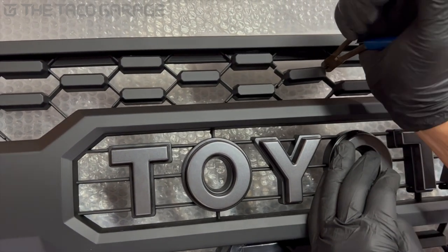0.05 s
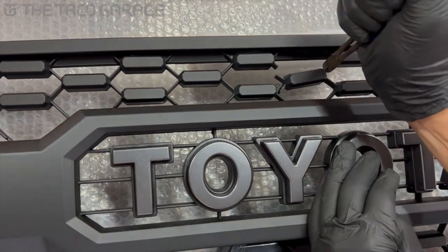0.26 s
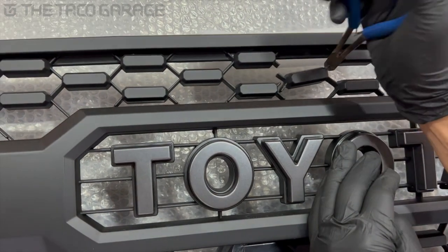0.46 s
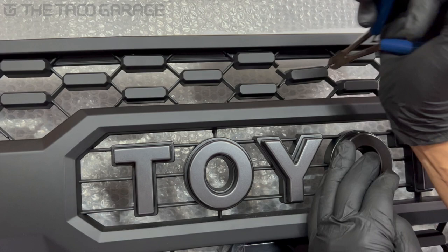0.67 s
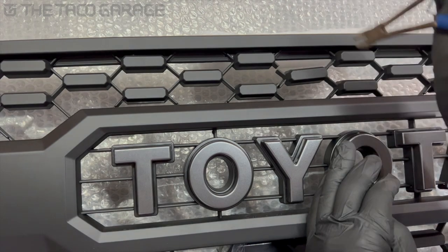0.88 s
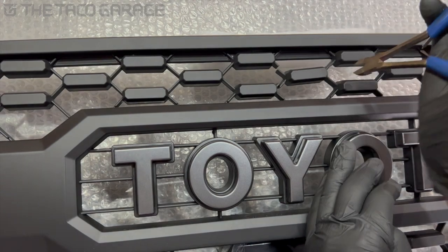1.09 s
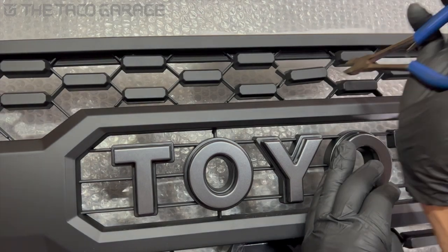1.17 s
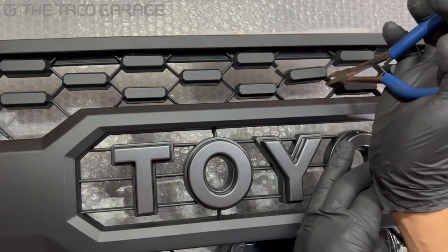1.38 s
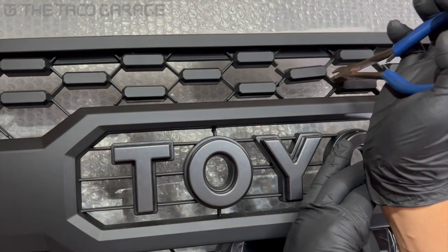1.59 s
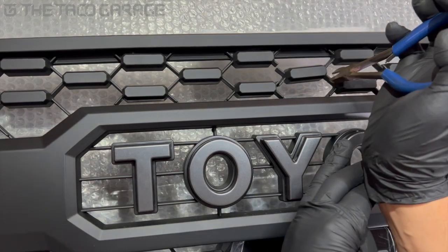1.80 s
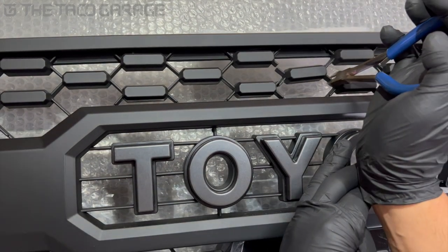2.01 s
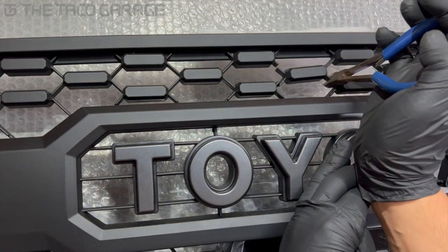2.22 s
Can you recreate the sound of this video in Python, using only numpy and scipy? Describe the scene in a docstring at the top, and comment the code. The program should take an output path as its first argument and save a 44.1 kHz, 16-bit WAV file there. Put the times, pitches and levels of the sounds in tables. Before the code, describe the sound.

Pliers snap through a plastic rib with one sharp loud crack, then knock on the hollow grille

```python
"""Pliers cutting a plastic grille

Close up in a garage, a plastic rib creaks and snaps; the jaws knock on the grille as they find the next rib.
Creak, jaws and grille are dying tones, with coloured noise for the crack, the contact ticks and dense ringing.
Metal clinks farther off, gloves rub, and the room adds its echo and a low rumble, both made from noise.
A limiter turns loud moments down, holds, then lets the room's echo swell back.
"""
import sys
import numpy as np
from scipy import signal
from scipy.fft import rfft, irfft
from scipy.io import wavfile
from scipy.ndimage import uniform_filter1d, minimum_filter1d

SR = 44100
rng = np.random.default_rng(int(sys.argv[2]) if len(sys.argv) > 2 else 0)


def file_out(sig):
    """Save sig as 16-bit WAV at sys.argv[1]."""
    # one column per channel
    cols = np.atleast_2d(sig).T
    # limit, then scale
    lim = np.clip(cols, -1, 1)
    pcm = np.round(lim * 32767).astype(np.int16)
    wavfile.write(sys.argv[1], SR, pcm)


N = 99225
T = np.arange(N) / SR  # time in s

# how alike left and right are for far sounds: f/Hz, likeness/0-1
FAR_LIKENESS = [(130, 0.99), (300, 0.42), (600, 0.069)]
# the same for sounds close by: f/Hz, likeness/0-1
NEAR_LIKENESS = [(100, 0.87), (500, 0.64), (1200, 0.14)]


def amp(db):
    """Turns decibels into a gain."""
    return 10 ** (np.asarray(db) / 20)


def read(points, hz):
    """Reads a table between its points, on a log-frequency axis."""
    f, value = np.transpose(points)
    return np.interp(np.log(hz + 1), np.log(f), value)


def add(mix, s, sound):
    """Mixes a sound in at time s, cutting off what runs past the end."""
    part = mix[:, round(s * SR):][:, :sound.shape[-1]]
    part += sound[..., :part.shape[1]]


def pan(db):
    """Left and right gains whose difference is db."""
    return amp(np.array([[db], [-db]]) / 2)


def fade(t, t60):
    """Exponential decay that falls by 60 dB in t60 seconds."""
    return np.exp(-np.log(1000) * t / max(t60, 1e-3))


def treble_tilt(hz, db_per_octave):
    """Level change in dB that grows with each octave above 1 kHz."""
    return db_per_octave * np.log2(np.maximum(hz / 1000, 1))


def noise(colour, likeness, size, tilt_db=0, decay=None):
    """Coloured stereo noise, scaled to unit power; with a decay table each band then dies at its own speed."""
    hz = np.fft.rfftfreq(size, 1 / SR)
    a, b = np.exp(2j * np.pi * rng.random((2, len(hz))))
    c = np.clip(read(likeness, hz), -1, 1)
    mid, side = a * np.sqrt(1 + c), b * np.sqrt(1 - c)
    level = amp(read(colour, hz) + treble_tilt(hz, tilt_db)) * (hz > 20)
    spectrum = np.array([mid + side, mid - side]) * level
    spectrum /= irfft(spectrum, size).std()
    if decay is None:
        return irfft(spectrum, size)
    centres = np.geomspace(100, 16000, 12)
    out = 0
    for f, band in zip(centres, np.eye(len(centres))):
        share = np.interp(hz, centres, band)  # overlapping triangles
        out = out + irfft(spectrum * share, size) * fade(T[:size], read(decay, f))
    return out


def ring(modes, size, tilt_db=0):
    """Dying tones of a struck object; each reaches the two microphones in a different phase."""
    t, out = T[:size], 0
    for hz, db, t60 in modes:
        apart = np.arccos(np.clip(read(NEAR_LIKENESS, hz), -1, 1)) * rng.choice([-1, 1])
        phase = 2 * np.pi * rng.random() + np.array([[0], [apart]])
        level = amp(db + treble_tilt(hz, tilt_db))
        out = out + level * fade(t, t60) * np.sin(2 * np.pi * hz * t + phase)
    return out * np.sin(np.pi / 2 * np.minimum(t / .0006, 1)) ** 2  # soft start


def snap(jaw_db):
    """The crack runs through the rib in a few milliseconds as noise, and the jaws slam shut and ring."""
    # colour of the crack: f/Hz, level/dB per Hz
    crack_colour = [(60, -26.5), (600, -5), (1800, 0.5), (3000, -4), (5800, -5), (7300, -10.5), (9200, -8),
                    (15500, -25.5)]
    # ring of the jaws: f/Hz, level/dB, t60/s
    jaw_modes = [(2230, -8, 0.045), (3625, 1, 0.013), (4190, 2, .014), (5800, 0.5, 0.013)]
    crack_db = -4
    rise_s, hold_s, t60_s = .001, .0027, .02
    t = T[:SR // 10]
    shape = np.minimum(t / rise_s, 1) * fade(np.maximum(t - hold_s, 0), t60_s)
    crack = noise(crack_colour, NEAR_LIKENESS, len(t)) * shape
    out = amp(crack_db) * crack / crack[:, :SR // 200].std()  # level of the first 5 ms
    add(out, rise_s, amp(jaw_db) * ring(jaw_modes, len(t)))
    return out


def creak():
    """Quick slips swell and ease as the blades sink into the rib; each slip rings a few short tones."""
    # tones of the giving rib: f/Hz, level/dB, t60/s, left-right difference/dB
    rib_modes = [(646, -5, 0.079, -2.5), (1390, -9, .05, 15.5), (2190, 2, 0.03, 9.5),
                 (2820, -6.5, 0.017, 14.5), (3380, -5.5, 0.023, 11), (6410, -4, 0.029, -9)]
    length_s, level_db = .013, -21.5
    t = T[:SR // 10]
    times = (np.arange(12) + rng.random(12)) / 12 * length_s
    slips = np.zeros(len(t))
    slips[(times * SR).astype(int)] = np.sin(np.pi * times / length_s) ** 2
    out = 0
    for hz, db, t60, left_right_db in rib_modes:
        tone = ring([(hz, db, t60)], len(t))
        out = out + pan(left_right_db) * signal.fftconvolve(tone, slips[None])[:, :len(t)]
    return amp(level_db) * out / out[:, :SR // 60].std()  # level of the first 17 ms


def tick(t60, hz):
    """Steel touching plastic: a bright burst and three short blade notes, set by the point of contact."""
    # colour of the burst: f/Hz, level/dB per Hz
    burst_colour = [(300, -8.5), (1000, 3.5), (2300, 5.5), (3200, -5), (9000, -12), (15000, -25)]
    notes_db, note_ratio = -7.5, 1.1
    rise_share = .047  # a sliding touch builds up over this share of its decay time
    t = T[:SR // 8]
    burst = noise(burst_colour, NEAR_LIKENESS, len(t)) * fade(t, t60)
    notes = [(f, 0, t60) for f in (hz / note_ratio, hz, hz * note_ratio)]
    touch = burst + amp(notes_db) * ring(notes, len(t))
    return touch * np.minimum(t / (rise_share * t60), 1)


def knock(db, tilt_db, tick_db, tick_hz, boom_db):
    """A contact tick, the hollow ring of the grille, and the slower boom of the whole panel."""
    # clear tones of the grille: f/Hz, level/dB, t60/s
    grille_modes = [(455, -8, 0.11), (553, -7.5, 0.09), (726, -5.5, .12), (898.4, -4.5, 0.098),
                    (1009, -2, .1), (1120, -3, 0.062), (1622, -3, .06), (2747, -6, 0.047)]
    # its dense ringing: f/Hz, level/dB per Hz
    grille_colour = [(100, -18.5), (300, -4), (500, -9), (950, 3.5), (1300, -3.5), (1700, -2), (2600, -6.5),
                     (3400, -20.5), (4400, -15), (7000, -23.5), (15000, -43.5)]
    # how fast that ringing dies: f/Hz, t60/s
    grille_decay = [(150, 0.56), (1000, 0.13), (2500, 0.1), (9000, 0.018)]
    modes_db, rise_s = -3, .0015
    boom_hz, boom_t60_s, boom_rise_s = 134.5, .24, .025
    t = T[:SR // 3]
    dense = noise(grille_colour, NEAR_LIKENESS, len(t), tilt_db, grille_decay)
    body = dense + amp(modes_db) * ring(grille_modes, len(t), tilt_db)
    out = body * np.minimum(t / rise_s, 1)
    swell = np.minimum(t / boom_rise_s, 1) ** 2
    boom_shape = swell * fade(np.maximum(t - boom_rise_s, 0), boom_t60_s)
    out += amp(boom_db) * boom_shape * np.sin(2 * np.pi * boom_hz * t)
    add(out, 0, amp(tick_db) * tick(t60=.02, hz=tick_hz))
    return amp(db) * out


def clink():
    """Distant metal: ringing tones that waver at random, in a dying wash of noise like room echo."""
    # tones of the metal: f/Hz, level/dB, t60/s
    metal_modes = [(2430, 24, 0.045), (4280, 2, 0.53), (5250, 6, 0.45), (6826, -2, 0.78)]
    # colour of the wash: f/Hz, level/dB per Hz
    wash_colour = [(200, -3), (800, 2.5), (2900, -9), (3500, -14), (6800, -16), (8000, -32), (15000, -63.5)]
    # how fast the wash dies: f/Hz, t60/s
    wash_decay = [(300, 2), (7000, 0.59)]
    tones_db, wash_db, rise_s = -60, -46, .012
    t = T[:SR // 3]
    wash = amp(wash_db) * noise(wash_colour, FAR_LIKENESS, len(t), decay=wash_decay)
    waver = uniform_filter1d(rng.standard_normal((2, len(t))), size=220)
    waver = uniform_filter1d(waver, size=220)
    tones = amp(tones_db) * ring(metal_modes, len(t)) * waver / waver.std()
    return (wash + tones) * np.minimum(t / rise_s, 1)


def garage(x):
    """The echo of a hard-walled room: each sound trails off in noise that fades at its own speed per band."""
    # colour of the echo: f/Hz, level/dB
    room_colour = [(200, 4.5), (2100, 1.5), (3300, 2.5), (5800, 6.5), (9500, -9.5), (15000, -15)]
    # how fast the echo dies: f/Hz, t60/s
    room_decay = [(150, 0.8), (1500, 1.17), (5000, 0.7234), (9500, 1.23), (15000, 0.94)]
    build_s = .0075
    tail = noise(room_colour, FAR_LIKENESS, N, decay=room_decay) * np.minimum(T / build_s, 1)
    return signal.fftconvolve(x, tail / np.linalg.norm(tail[0]), axes=1)[:, :N]


def gloves(rough_db=2.0):
    """Uneven low rubbing as the hands shift on the grille: noise with a slow and a lumpy level."""
    # loudness of the rubbing: t/s, level/dB
    rub_level = [(.17, -49), (.3, -46), (.52, -61), (.95, -57), (1.3, -59), (1.85, -49), (2.16, -53.5),
                 (2.24, -46)]
    # its colour: f/Hz, level/dB per Hz
    rub_colour = [(25, -18), (50, 1), (150, 1.5), (400, -11), (3500, -30.5), (6500, -34), (11000, -55.5)]
    lumps = uniform_filter1d(rng.standard_normal(N), size=900)
    level_db = np.interp(T, *np.transpose(rub_level)) + rough_db * lumps / lumps.std()
    return noise(rub_colour, FAR_LIKENESS, N) * amp(level_db)


def room_rumble():
    """Steady background noise, strongest in the bass."""
    # colour of the rumble: f/Hz, level/dB per Hz
    rumble_colour = [(25, -18), (50, 0), (170, -3), (350, -16), (1300, -27), (4300, -44), (6200, -39),
                     (10500, -60), (16000, -70)]
    return amp(-53) * noise(rumble_colour, FAR_LIKENESS, N)


def microphones(x):
    """The treble leans right; at the very top the left becomes a slightly later copy of the right."""
    # left level against right: f/Hz, level/dB
    balance = [(3300, -0.5), (5400, -10), (7200, -11.5), (8400, 0)]
    blend_hz, lag_s = 8100, .000022
    spectrum, hz = rfft(x), np.fft.rfftfreq(N, 1 / SR)
    ratio = amp(read(balance, hz))
    left, right = spectrum * np.sqrt(2 / (1 + ratio ** 2))
    blend = np.pi / 4 * (1 + np.tanh((hz - blend_hz) / 600))
    late_right = right * np.exp(-2j * np.pi * hz * lag_s)
    left = np.cos(blend) * left + np.sin(blend) * late_right
    return irfft(np.array([ratio * left, right]), N)


def scene():
    """The cut and the knocks with a quick reflection off the grille, the far clink, echo and background."""
    # blows on the grille; the last row is the contact that starts the clink:
    # t/s, level/dB, treble tilt/dB per octave, contact tick/dB, blade note f/Hz, panel boom/dB
    # (tick and boom are relative to the level of their row)
    contacts = [(0.2206, -23, -5.5, -22, 1800, -6), (0.233, -19, 3.5, -18.5, 2330, -10),
                (0.6014, -25.5, 6, 3, 4520, -17.5), (0.6046, -27.5, 1, 3.5, 1692, -6),
                (1.3735, -45, -4, -0.5, 4030, -4.5), (1.536, -37.5, -6, -4.5, 5790, -12),
                (1.6568, -38.5, -6, -8, 4060, -1.5), (1.981, -41, 0.5, -1, 4260, -1.5),
                (1.989, -32, -6, -9.5, 4170, -14), (2.085, -42, -2, -13, 2500, -11)]
    # light touches of the jaws: t/s, level/dB, t60/s, blade note f/Hz
    touches = [(1.41, -52, 0.022, 4480), (1.527, -46, 0.057, 4260), (1.580, -56, 0.023, 6100),
               (1.795, -54, 0.055, 4200)]
    creak_s, snap_s, clink_s = .203, .2183, 2.083
    snap_echo_db, knock_echo_db = -18, -20
    reflect_s, reflect_db = .00168, -13.5

    cut, taps, far = np.zeros((3, 2, N))
    add(cut, creak_s, creak())
    add(cut, snap_s, snap(jaw_db=2))
    for s, *contact in contacts:
        add(taps, s, knock(*contact))
    for s, db, t60, hz in touches:
        add(taps, s, amp(db) * tick(t60, hz))
    add(far, clink_s, clink())

    echo = garage(amp(knock_echo_db) * taps)
    for _ in range(3):  # three echoes of fresh crack noise add up to one even tail
        add(echo, snap_s, garage(amp(snap_echo_db) * snap(jaw_db=-7)))

    # the treble bounces once off the grille beside the jaws
    near = cut + taps
    treble = signal.sosfiltfilt(signal.butter(2, 2000, "high", fs=SR, output="sos"), near)
    add(near, reflect_s, amp(reflect_db) * treble)
    return near + far + echo + gloves() + room_rumble()


def record(dry):
    """A look-ahead limiter ducks (the bass less), holds and recovers; then a ceiling and a treble cutoff."""
    limit_db, look_s, hold_s, recover_db_per_s = -9, .025, .13, 95
    crossover_hz, bass_share = 162, .35  # bass below the crossover takes this share of the ducking
    edge_hz = 16300
    dry = microphones(dry)
    power = abs(uniform_filter1d((dry ** 2).mean(0), size=220))
    over_db = np.maximum(10 * np.log10(power + 1e-12) - limit_db, 0)
    hold, look = int(hold_s * SR) | 1, int(look_s * SR) | 1  # odd sample counts
    held = -minimum_filter1d(-over_db, hold, origin=hold // 2)  # largest recent excess
    # after the hold, the ducking eases off at a steady rate
    fall = recover_db_per_s * T
    duck_db = np.maximum.accumulate(held + fall) - fall
    # widen, then smooth, so the ducking starts before the loud moment
    duck_db = -minimum_filter1d(-duck_db, look)
    duck_db = uniform_filter1d(duck_db, look)
    bass = signal.sosfiltfilt(signal.butter(2, crossover_hz, fs=SR, output="sos"), dry)
    ducked = (dry - bass) * amp(-duck_db) + bass * amp(-bass_share * duck_db)
    out = np.clip(ducked, -.85, .85)
    lowpass = signal.firwin(255, edge_hz, window=("kaiser", 9), fs=SR)
    return signal.oaconvolve(out, lowpass[None], "same")


dry = scene()
out = record(dry)
file_out(out)
```